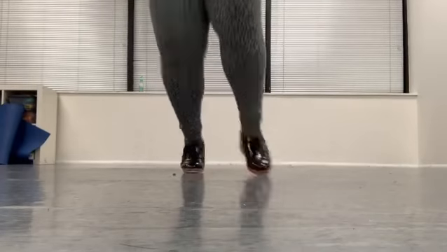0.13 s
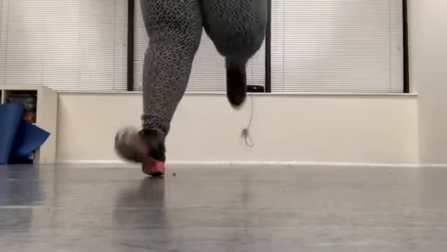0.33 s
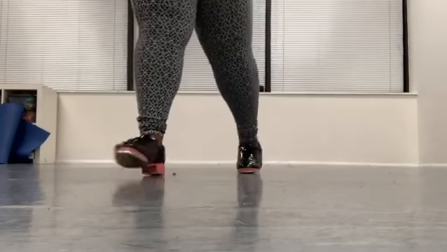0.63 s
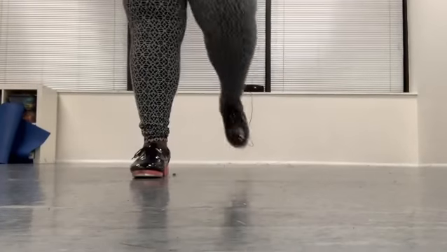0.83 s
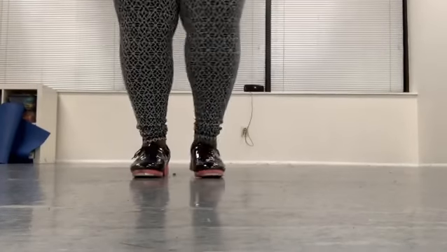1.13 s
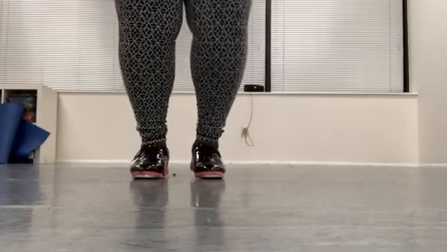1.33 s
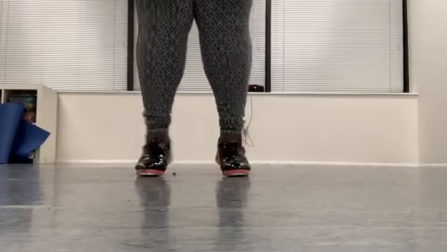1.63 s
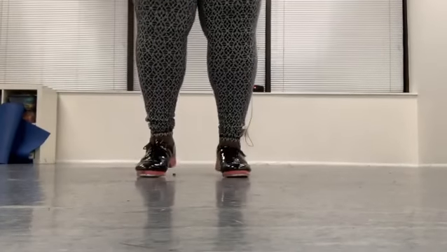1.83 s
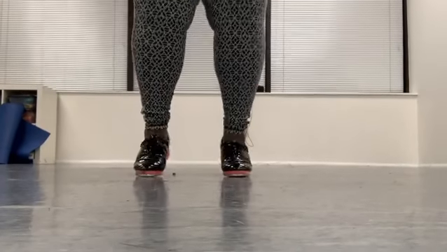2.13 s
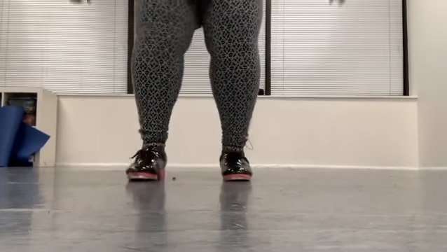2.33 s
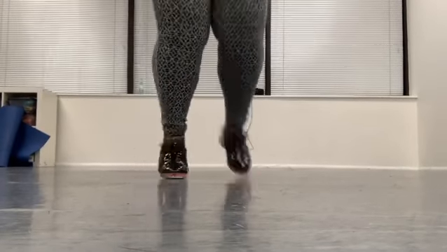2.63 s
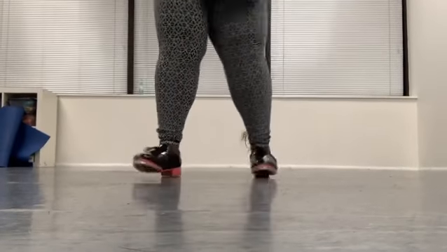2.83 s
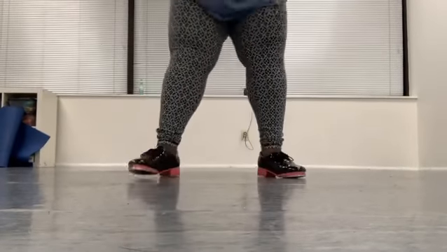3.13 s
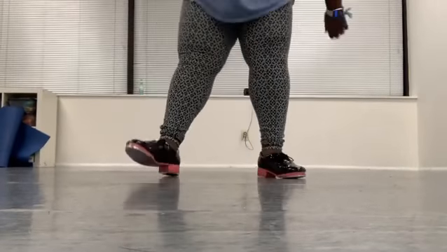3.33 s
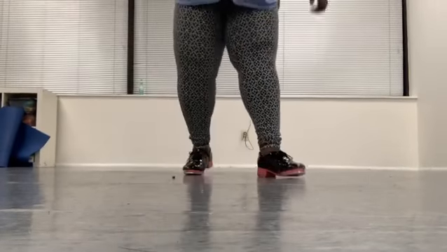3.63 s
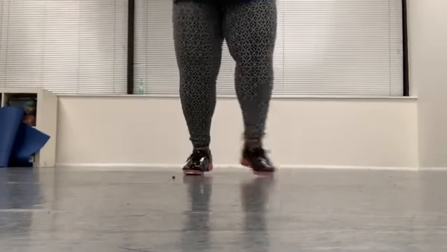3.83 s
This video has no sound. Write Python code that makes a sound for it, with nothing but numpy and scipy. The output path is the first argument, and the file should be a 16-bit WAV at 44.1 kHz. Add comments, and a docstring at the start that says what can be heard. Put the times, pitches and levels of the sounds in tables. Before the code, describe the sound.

A tap dancer's metal plates strike a hard studio floor in uneven bursts with pauses.

```python
"""A sprung floor in a bare studio: a tap dancer, heard from a phone lying low a couple of metres away.
Each metal plate clacks as a snap plus damped modes, and the sole knocks as lower damped modes.
Then the boards thud as bands of decaying noise, and a few slow floor modes boom last.
Landing plates scuff with chattering noise; soles brush the flexing floor before a jump.
The room returns scattered early reflections and a tail, over still air."""
import sys
import numpy as np
from scipy import signal
from scipy.fft import rfft, irfft
from scipy.io import wavfile
from scipy.ndimage import uniform_filter1d

SR = 44100
rng = np.random.default_rng(int(sys.argv[2]) if len(sys.argv) > 2 else 0)


def inscribe(sig):
    """Save sig as 16-bit PCM at rate SR to the path in sys.argv[1].

    A 1-D sig is mono; a 2-D sig holds one channel per row.
    Samples are clipped to [-1, 1] before scaling.
    """
    pcm = np.round(np.clip(np.atleast_2d(sig).T, -1, 1) * 32767)
    wavfile.write(sys.argv[1], SR, pcm.astype(np.int16))


N = 176400

# footfalls: start_s, clack_pitch_hz, ring_pitch_hz, knock_db, clack_db, ring_db, tick_db,
# boom_db, thud_db, scuff_db, room_send_db
TAPS = [(-0.045,1050,2840,-28,-25.5,-32,-47,-11,-13.5,-64,11.5),
        (0.053,980,3390,-13,-23,-14.5,-19,-52,-56,-56,-4),
        (0.205,1295,2440,-12.5,-12,-18,-26,-21.5,-19.5,-28.5,1.5),
        (0.3305,1020,3290,-10,-17,-15.5,-27,-41,-18.5,-54,-6),
        (0.393,1210,2760,-13,-23,-21.5,-29,-19.5,-19.5,-44,-1.5),
        (0.4695,1170,2780,-13,-11,-19,-19.5,-14.5,-12,-35.5,-2),
        (0.526,1400,2350,-6.5,-14,-18.5,-30,-14,-16.5,-58,0.5),
        (0.779,1184,3850,-24,-14,-16.5,-19,-15.5,-15.5,-36.5,-3.5),
        (1.091,1306,2620,-11,-13,-16,-30,-17,-17,-41,0), (1.684,1260,2420,-10.5,-15,-18,-27,-36,-23,-43,0),
        (1.692,1200,2750,-25,-14,-14.5,-25,-29.5,-23,-38,1),
        (2.283,1400,2970,-5,-13.5,-19,-22,-13,-11,-33,0),
        (2.556,1484,2900,-17.5,-13.5,-16.5,-31,-30.5,-22.5,-42,1),
        (2.6185,1510,2870,-19,-21,-27,-26.5,-37,-20,-52,-14),
        (2.66,1020,2930,-11,-21.5,-26,-35,-21,-15.5,-48,-6.5),
        (2.745,1400,2380,-14.5,-16.5,-30,-25.5,-32,-19.5,-65,-9.5),
        (2.806,1020,2990,-18,-17,-20.5,-31,-19,-14.5,-38,-0.5),
        (2.868,1010,3200,-20.5,-21.5,-25.5,-32.5,-16.5,-18.5,-39,4),
        (3.003,1070,3700,-16,-18.5,-17,-20.5,-26,-21.5,-42,-4.5),
        (3.07,1290,2150,-19,-15.5,-20.5,-26.5,-17.5,-17,-38.5,-3),
        (3.53,1630,2590,-12,-16,-18.5,-28.5,-32,-28.5,-38,-3.5),
        (3.666,1350,2880,-9.5,-19,-21,-29.5,-37,-17,-49,2),
        (3.92,1050,2360,-12,-15,-23.5,-25,-33,-23,-39.5,-2)]
# light touches and rebounds of a plate: start_s, ring_db, tick_db
TOUCHES = [(0.351, -35, -36), (0.482, -23, -34), (3.015, -36, -43), (3.319, -62, -38.5)]
# plate on its sole: pitch_hz, level_db (relative within its band), t60_s
PLATE_MODES = [(890, -6.5, 0.026), (1290, 5, 0.018), (1606, 4, 0.0092), (2488, 4, 0.012),
               (3077, 4.5, 0.015), (3430, -2, 0.025), (6274, 13.5, 0.017), (7170, 4, 0.022),
               (11410, -12, 0.009)]
# sole against the boards: pitch_hz, level_db (relative), t60_s
SOLE_MODES = [(222, -1.5, 0.044), (309, -1, 0.036), (423.5, 0.5, 0.024), (581, -6, 0.022)]
# sprung floor: pitch_hz, level_db (relative), t60_s
FLOOR_MODES = [(57.6, -10, 0.26), (71.5, -3, .24), (85, -7, 0.28), (99.2, -11.5, 0.16), (130, 2.5, 0.084)]
# board thud: centre_hz, density_db_per_hz (relative), t60_s
BOARD_BANDS = [(91, -4.5, 0.89), (109, 7.5, 0.32), (161, -0.5, 0.51), (244, -6, 0.17), (287, -5, 0.39),
               (423, -6, 0.67), (530, -12.5, 0.51), (790, -16, 0.38), (1400, -28, 0.23)]
# plate scuffing the floor: centre_hz, density_db_per_hz (relative), t60_s
SCUFF_BANDS = [(700, -4.5, .13), (1500, -26.5, 0.13), (3200, 9.5, 0.17), (4340, 5.5, 0.54),
               (6900, -4, 0.41), (12200, -15.5, 0.39)]
# boom lingering in the room: centre_hz, density_db_per_hz (relative), t60_s
LINGER_BANDS = [(45, -16, 0.65), (72.3, 4.5, 1), (111, -5, 0.92)]
# room tail: centre_hz, density_db_per_hz (relative), t60_s
ROOM_BANDS = [(48.7, -7.5, 0.66), (143, -7, 0.68), (352, 2, 0.7), (1030, -2.5, 0.56), (1510, -9, 0.76),
              (2700, -2, 0.88), (3850, -4, 0.78), (5560, -10.5, 1), (8050, -17, 1), (13900, -6, 0.42)]
# phase by which the left port leads: frequency_hz, lead_rad
PORT_LEAD = [(200, -1), (1000, 0.47), (3500, 0.36), (6000, 3.5), (7800, 1.5), (10200, 3), (12500, 8.5)]
# still air of the studio: frequency_hz, density_db_per_hz (relative)
AIR_SPECTRUM = [(25, -15), (70, -2), (400, -29), (1500, -23), (14000, -69)]
# soles brushing: frequency_hz, density_db_per_hz (relative)
BRUSH_SPECTRUM = [(450, 4), (3500, -8.5), (14000, -34)]
# early reflections: frequency_hz, density_db_per_hz (relative)
EARLY_SPECTRUM = [(100, -5), (500, 7.0), (3000, 4.5), (14000, -13.5)]

# plate contact: band edges, random crack beside a unit snap, upper edge of the snap
CLACK_TOP_HZ, RING_TOP_HZ, TOP_HZ = 1850, 4600, 13600
CRACK_DB, CRACK_DECAY_S, SNAP_TOP_HZ, CONTACT_RISE_S = -2, 0.002, 7400, 0.00008
BEND_S = 0.00111  # delay through the boards at the second plate mode; higher bending waves run faster
PITCH_SPREAD, MODE_SPREAD_DB = 0.042, 2  # blow to blow; pitch as a fraction
# the floor carries each clack to the phone a little ahead of the air
AHEAD_S, AHEAD_DB, AHEAD_TOP_HZ = 0.00215, -14, 2400
CEILING_LAG_S, CEILING_DB = .0168, -23.5  # one distinct reflection
SOLE_LAG_S, SOLE_RISE_S = .0016, 0.0019
BOARD_LAG_S, BOARD_RISE_S = 0.00607, 0.0024
FLOOR_LAG_S, FLOOR_RISE_S = 0.01337, 0.0095
LINGER_DB = -11.5  # relative to the boom
SCUFF_LAG_S, GRIT_DB, GRIT_S = 0.0098, 4.5, 0.0022
# time over which each layer's level is held
PLATE_HOLD_S, SOLE_HOLD_S, BOARD_HOLD_S, FLOOR_HOLD_S, SCUFF_HOLD_S = 0.0056, 0.0028, 0.023, 0.032, 0.08
# difference between the ports
BOARD_SIDE, FLOOR_SIDE, ROOM_SIDE, PLATE_SIDE = 0.34, 0.28, 1, 0.36
PUSH_S, PUSH_LENGTH_S, BRUSH_DB, FLEX_DB = 1.55, .1, -44.5, -40.5
ROOM_LAG_S, ROOM_RISE_S, ROOM_DB = .006, 0.014, -7.5
EARLY_DB, EARLY_DECAY_S = -12, 0.029
# places on the floor with their own echoes; depth and width of the room resonances they share
SPOTS, RIPPLE_DB, RIPPLE_HZ = 5, 3, 70
PLATE_BLEND_HZ, SOLE_BLEND_HZ = 920, 210  # width over which the room blends resonances
AIR_DB = -58


def tap(spot, clack_hz, ring_hz, knock_db, clack_db, ring_db, tick_db, boom_db, thud_db, scuff_db, room_db):
    """The parts of one footfall with their lags: metal leads, boards follow, floor boom comes last."""
    metal = plate(clack_hz, ring_hz, clack_db, ring_db, tick_db)
    through_floor = signal.butter(2, AHEAD_TOP_HZ, fs=SR, output="sos")
    ahead = undb(AHEAD_DB) * signal.sosfilt(through_floor, metal)
    knock = sole_knock(knock_db)
    boom, linger = floor_boom(boom_db)
    blended = blend(metal, PLATE_BLEND_HZ) + blend(knock, SOLE_BLEND_HZ)
    walls = undb(room_db) * echo(blended, spot)
    return [
        (ahead, -AHEAD_S),
        (metal, 0),
        (knock, SOLE_LAG_S),
        (board_thud(thud_db), BOARD_LAG_S),
        (plate_scuff(scuff_db), SCUFF_LAG_S),
        (boom, FLOOR_LAG_S),
        (linger, FLOOR_LAG_S),
        (walls, ROOM_LAG_S),
        (undb(CEILING_DB) * metal, CEILING_LAG_S),
    ]


def plate(clack_hz, ring_hz, clack_db, ring_db, tick_db):
    """Metal meets the floor: a sharp snap, brief contact noise, and modes pitched by the part that lands."""
    count = 2048
    t, hz = np.arange(count) / SR, np.fft.rfftfreq(count, 1 / SR)
    clack_ref_hz, ring_ref_hz = PLATE_MODES[1][0], PLATE_MODES[4][0]
    edges_hz = [PLATE_MODES[0][0] * 2 / 3, CLACK_TOP_HZ, RING_TOP_HZ, TOP_HZ + 1000]
    levels_db = (clack_db, ring_db, tick_db)
    stretches = (clack_hz / clack_ref_hz, ring_hz / ring_ref_hz, 1)

    crack = sized(pair(count, PLATE_SIDE) * np.exp(-t / CRACK_DECAY_S), CRACK_DB, 1 / SR)
    soften = signal.butter(2, SNAP_TOP_HZ, fs=SR, output="sos")
    contact = signal.sosfilt(soften, (t == 0) + crack)

    out = 0
    for lo, hi, db, stretch in zip(edges_hz, edges_hz[1:], levels_db, stretches):
        band_modes = [(f * stretch, size, t60) for f, size, t60 in PLATE_MODES if lo < f <= hi]
        modes = ring(band_modes, CONTACT_RISE_S, PLATE_SIDE, count, sign=1)
        band = signal.butter(2, [lo * stretch, hi * stretch], "band", fs=SR, output="sos")
        snap = signal.sosfilt(band, contact)
        out = out + sized(sized(modes, 0, 1) + sized(snap, 0, 1), db, PLATE_HOLD_S)

    bending = 2 * np.pi * 2 * BEND_S * np.sqrt(hz * clack_ref_hz)
    phase = np.outer([0, -1], along(hz, PORT_LEAD, 1)) - bending
    fade = signal.windows.tukey(2 * count, .5)[count:]
    return irfft(rfft(out) * np.exp(1j * phase), count) * fade


def sole_knock(db):
    """The sole strikes the boards: short low-mid modes."""
    return sized(ring(SOLE_MODES, SOLE_RISE_S, PLATE_SIDE, SR // 10), db, SOLE_HOLD_S)


def board_thud(db):
    """Boards answer with densely packed modes."""
    return sized(wash(BOARD_BANDS, BOARD_SIDE, BOARD_RISE_S, 16384), db, BOARD_HOLD_S)


def floor_boom(db):
    """The sprung floor's few slow modes, and the low wash they leave in the room."""
    boom = sized(ring(FLOOR_MODES, FLOOR_RISE_S, FLOOR_SIDE, 12288), db, FLOOR_HOLD_S)
    linger = wash(LINGER_BANDS, FLOOR_SIDE, FLOOR_RISE_S, 24576)
    return boom, sized(linger, db + LINGER_DB, FLOOR_HOLD_S)


def plate_scuff(db):
    """A landing plate scrapes: decaying noise with an uneven gain."""
    scrape = wash(SCUFF_BANDS, ROOM_SIDE, BOARD_RISE_S, 8192)
    return sized(scrape * grit(8192), db, SCUFF_HOLD_S)


def grit(count):
    """Uneven gain of a plate that catches and chatters."""
    size = max(int(GRIT_S * SR), 1)
    return undb(GRIT_DB * np.sqrt(size) * uniform_filter1d(rng.standard_normal(count), size))


def push_off(spot):
    """Soles brush the floor as it flexes under the jump."""
    swell = np.hanning(int(PUSH_LENGTH_S * SR))
    brush = colour(pair(len(swell), PLATE_SIDE), BRUSH_SPECTRUM)
    brush = sized(brush * swell, BRUSH_DB, PUSH_LENGTH_S)
    flex = np.sin(2 * np.pi * FLOOR_MODES[1][0] * np.arange(len(swell)) / SR)
    flex = sized(flex * swell ** 2, FLEX_DB, PUSH_LENGTH_S)
    out = echo(brush[0], spot)
    add(out, brush + flex, 0)
    return out


def room(ripple_db):
    """Response from one spot on the floor: scattered early reflections and a diffuse tail."""
    t = np.arange(SR) / SR
    tail = wash(ROOM_BANDS, ROOM_SIDE, ROOM_RISE_S, SR)
    tail = irfft(rfft(tail) * undb(ripple_db), SR)
    tail *= signal.windows.tukey(2 * SR, .5)[SR:]
    scatter = pair(SR, ROOM_SIDE) * grit(SR)  # uneven gain clusters the reflections
    early = colour(scatter, EARLY_SPECTRUM) * np.exp(-t / EARLY_DECAY_S)
    return sized(tail, ROOM_DB, 1 / SR) + sized(early, EARLY_DB, 1 / SR)


def blend(x, width_hz):
    """A burst as the walls receive it from all directions: its resonances run together."""
    count = 8192
    power = np.mean(np.abs(rfft(x, count)) ** 2, axis=0)
    power = uniform_filter1d(power, int(width_hz * count / SR) + 1)
    pulse = irfft(np.sqrt(np.abs(power)), count)
    return np.roll(pulse, 128)[:256] * np.hanning(256)


def echo(pulse, spot):
    """What the room returns of a pulse."""
    return signal.oaconvolve(pulse[None], spot, axes=1)


def still_air():
    """Steady studio air: coloured noise partly shared by the ports."""
    return sized(colour(pair(N, BOARD_SIDE), AIR_SPECTRUM), AIR_DB, N / SR)


def ring(modes, rise_s, side, count, sign=-1):
    """Damped modes, a little different at every blow and at each port."""
    t, out = np.arange(count) / SR, 0
    ports = side * np.array([[1], [-1]]) / np.sqrt(2)
    draws = rng.standard_normal((len(modes), 4))
    for k, ((hz, db, t60_s), (detune, size, pan, skew)) in enumerate(zip(modes, draws)):
        pitch_hz = hz * (1 + PITCH_SPREAD * detune)
        wave = np.sin(2 * np.pi * pitch_hz * t + skew * ports) * np.exp(pan * ports)
        gain = sign ** k * undb(db + MODE_SPREAD_DB * size)
        out = out + gain * wave * np.exp(-np.log(1000) * t / t60_s)
    return out * (1 - np.exp(-(t / rise_s) ** 2))


def wash(table, side, rise_s, count):
    """Densely packed modes: overlapping noise bands that swell together and die at their own rates."""
    t, hz = np.arange(count) / SR, np.fft.rfftfreq(count, 1 / SR)
    spectrum = rfft(pair(count, side)) * undb(along(hz, table, 1))
    centres_hz, out = [row[0] for row in table], 0
    low_skirt = 1 + (centres_hz[0] / (hz + 1) / 1.3) ** 4
    high_skirt = 1 + (hz / centres_hz[-1] / 1.3) ** 4
    for share, row in zip(np.eye(len(table)), table):
        band = np.interp(np.log(hz + 1), np.log(centres_hz), share) / low_skirt / high_skirt
        out = out + irfft(spectrum * band, count) * np.exp(-np.log(1000) * t / row[2])
    return out * (1 - np.exp(-t / rise_s))


def pair(count, side):
    """Noise for two ports, partly shared."""
    a, b = rng.standard_normal((2, count))
    return np.array([a + side * b, a - side * b]) / np.sqrt(1 + side ** 2)


def colour(x, table):
    """Give a signal a spectrum."""
    count = x.shape[-1]
    return irfft(rfft(x) * undb(along(np.fft.rfftfreq(count, 1 / SR), table, 1)), count)


def along(hz, table, column):
    """Read a table column on a log-frequency axis."""
    table = np.array(table, float)
    return np.interp(np.log(hz + 1), np.log(table[:, 0]), table[:, column])


def undb(db):
    """Decibels to amplitude."""
    return 10 ** (np.asarray(db) / 20)


def sized(x, db, seconds):
    """Scale a burst to the energy of that level held for that time."""
    energy = np.mean(np.sum(np.atleast_2d(x) ** 2, axis=1))
    return x * undb(db) * np.sqrt(seconds * SR / energy)


def add(out, x, start_s):
    """Mix a burst in at its time, trimmed to the output."""
    i = int(round(start_s * SR))
    x = x[..., max(-i, 0):max(out.shape[-1] - i, 0)]
    out[:, max(i, 0):max(i, 0) + x.shape[-1]] += x


def scene():
    """Footfalls, light touches and a jump over the still air of the studio."""
    out = still_air()
    ripple = uniform_filter1d(rng.standard_normal(SR // 2 + 1), RIPPLE_HZ) * np.sqrt(RIPPLE_HZ)  # 1 Hz bins
    spots = [room(RIPPLE_DB * ripple) for _ in range(SPOTS)]
    add(out, push_off(spots[0]), PUSH_S)
    for k, (start_s, *strike) in enumerate(TAPS):
        for burst, lag_s in tap(spots[k % SPOTS], *strike):
            add(out, burst, start_s + lag_s)
    for start_s, ring_db, tick_db in TOUCHES:
        touch = plate(PLATE_MODES[1][0], PLATE_MODES[5][0], ring_db - 5.0, ring_db, tick_db)
        add(out, touch, start_s)
        add(out, echo(blend(touch, PLATE_BLEND_HZ), spots[0]), start_s + ROOM_LAG_S)
    return out


def record(dry):
    """The phone rounds the tallest peaks and cuts the top."""
    rounded = dry / (1 + dry ** 6) ** (1 / 6)
    return signal.sosfilt(signal.ellip(8, .2, 70, TOP_HZ, fs=SR, output="sos"), rounded)


dry = scene()
out = record(dry)
inscribe(out)
```